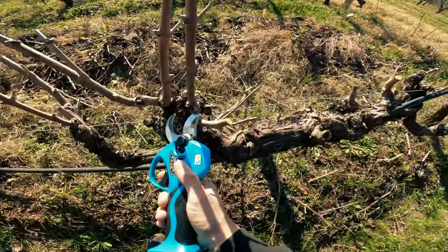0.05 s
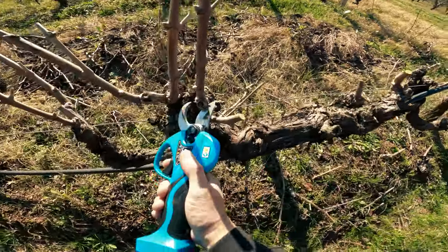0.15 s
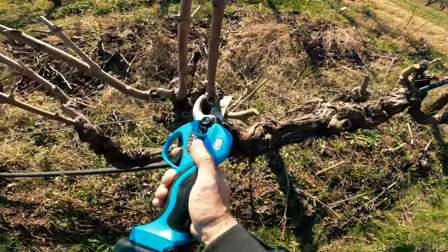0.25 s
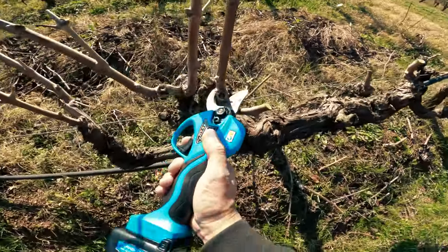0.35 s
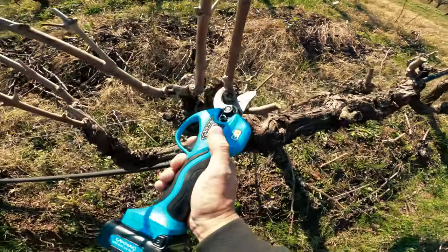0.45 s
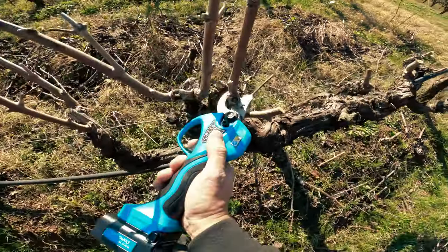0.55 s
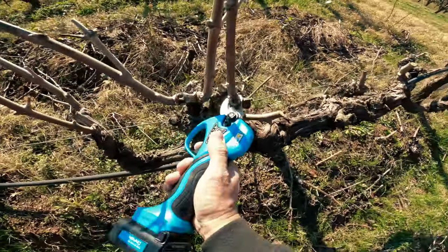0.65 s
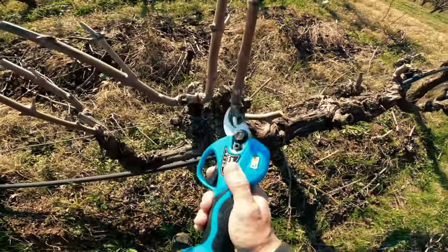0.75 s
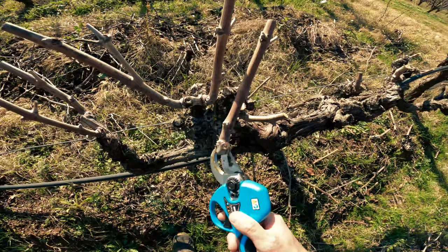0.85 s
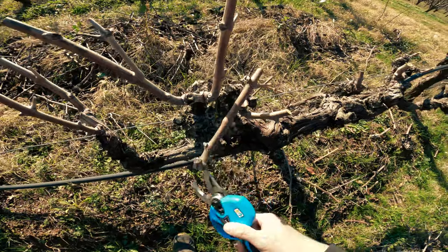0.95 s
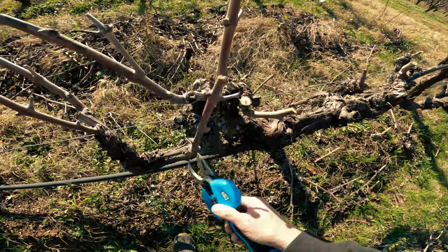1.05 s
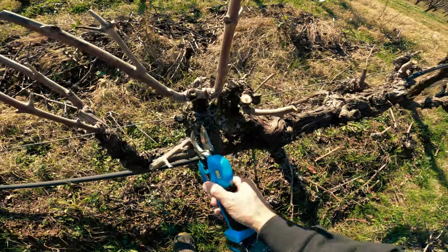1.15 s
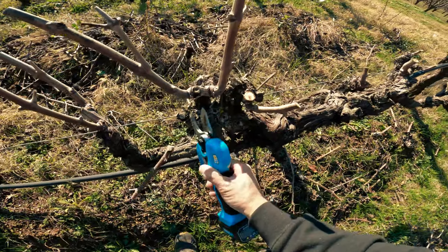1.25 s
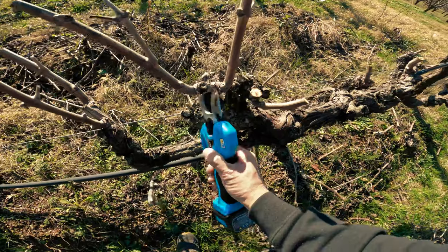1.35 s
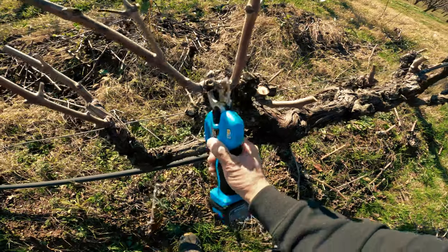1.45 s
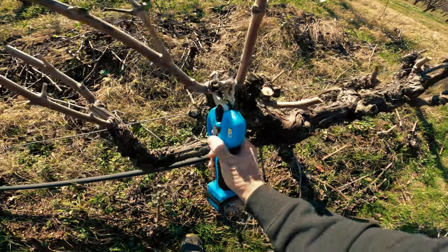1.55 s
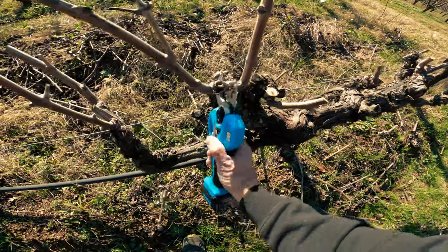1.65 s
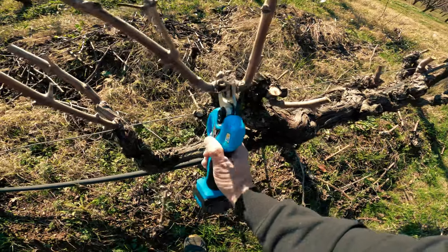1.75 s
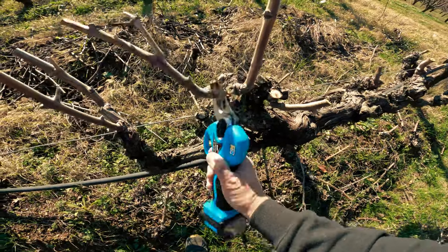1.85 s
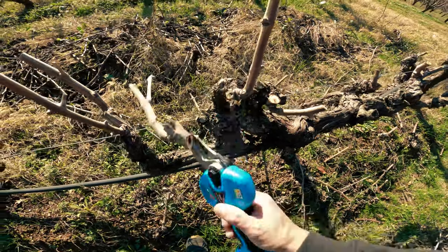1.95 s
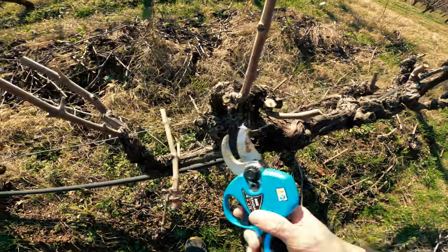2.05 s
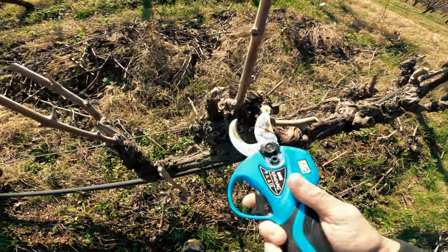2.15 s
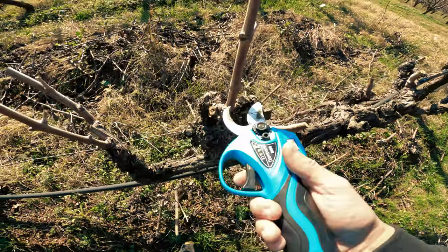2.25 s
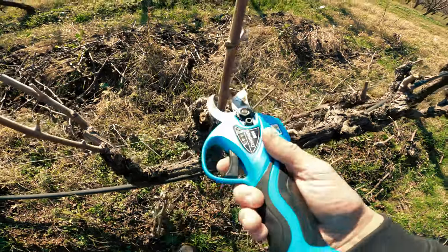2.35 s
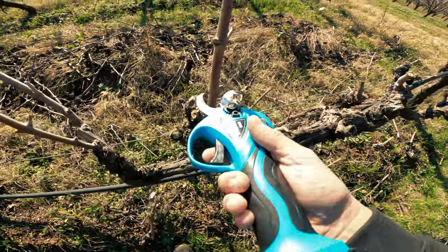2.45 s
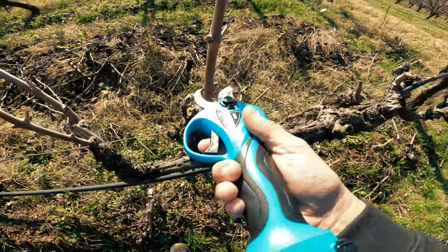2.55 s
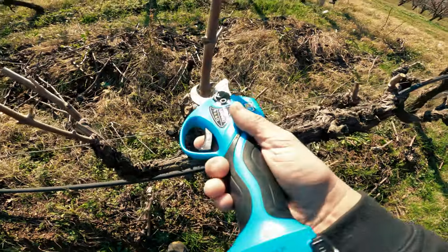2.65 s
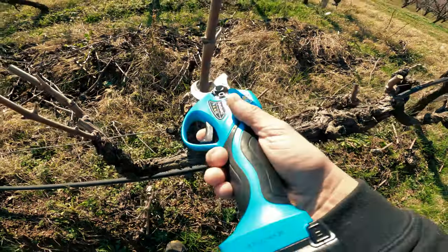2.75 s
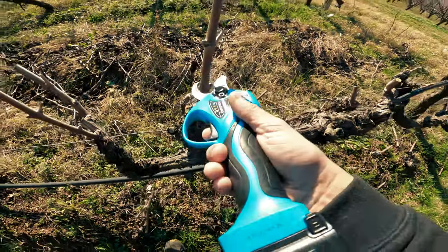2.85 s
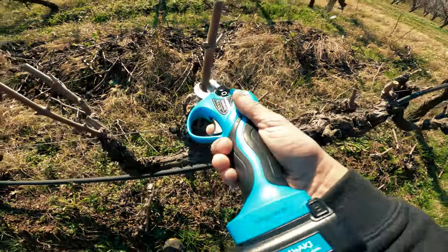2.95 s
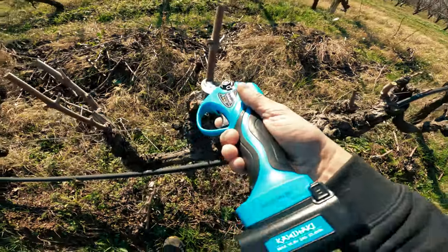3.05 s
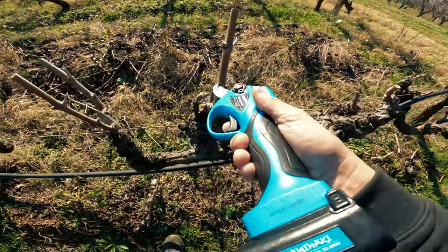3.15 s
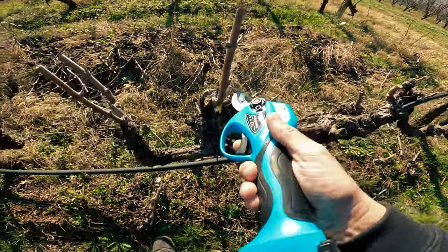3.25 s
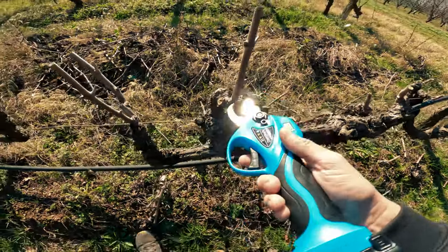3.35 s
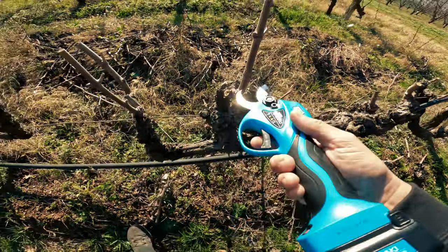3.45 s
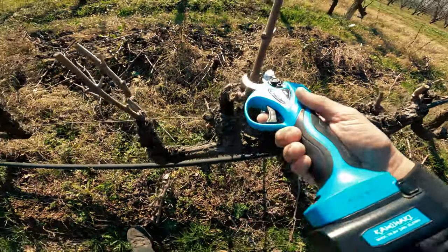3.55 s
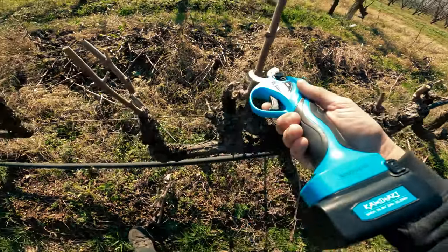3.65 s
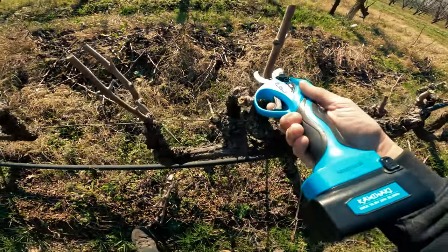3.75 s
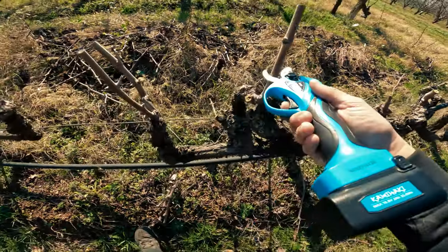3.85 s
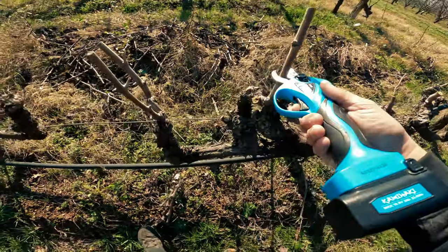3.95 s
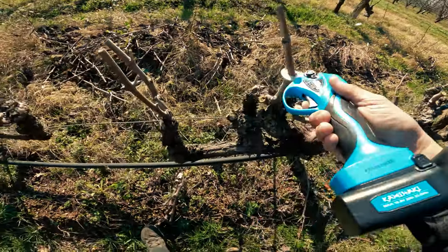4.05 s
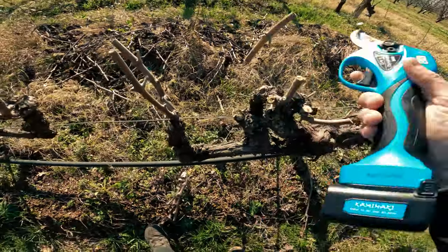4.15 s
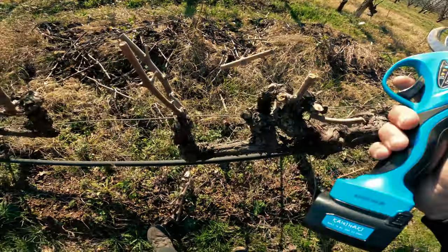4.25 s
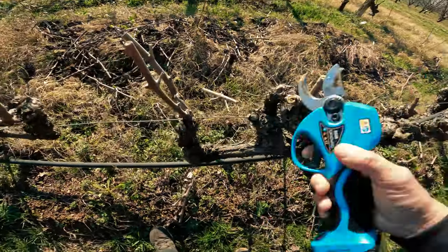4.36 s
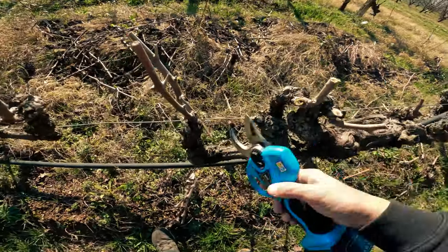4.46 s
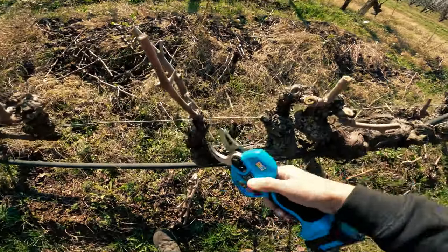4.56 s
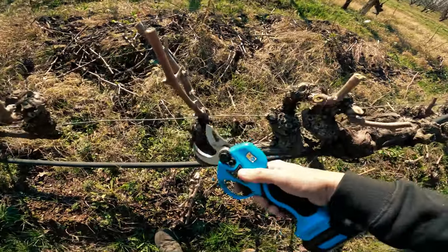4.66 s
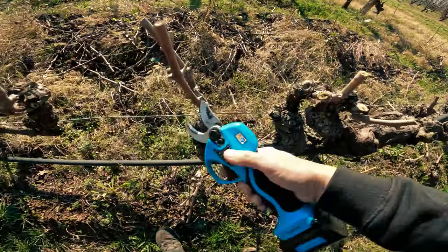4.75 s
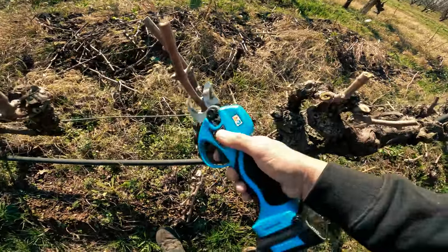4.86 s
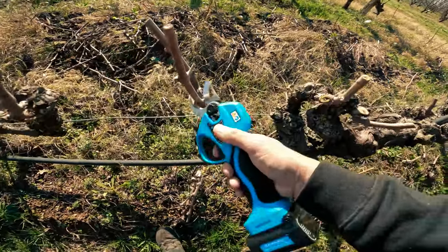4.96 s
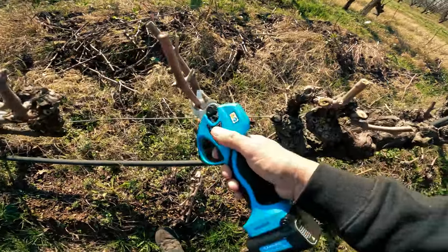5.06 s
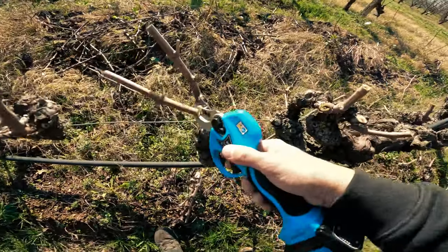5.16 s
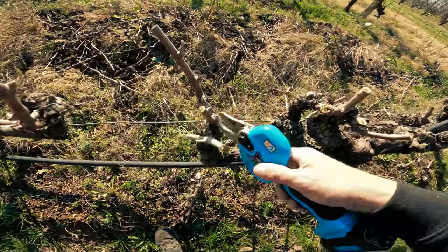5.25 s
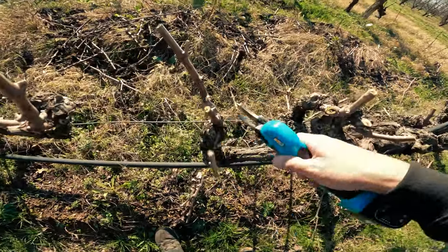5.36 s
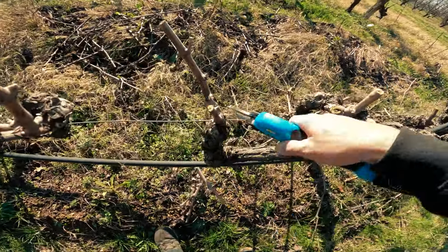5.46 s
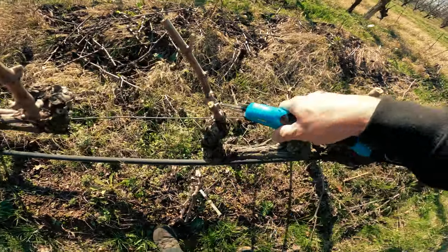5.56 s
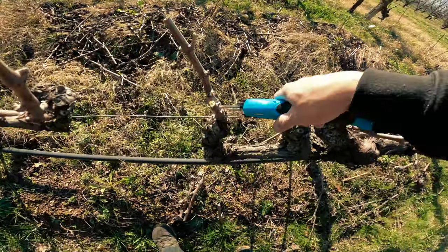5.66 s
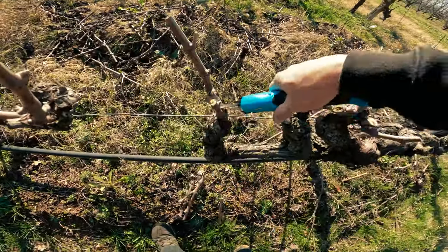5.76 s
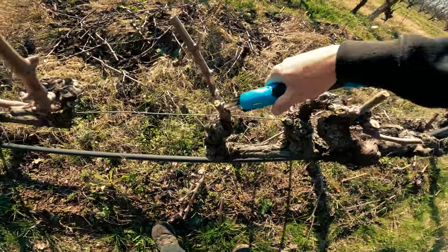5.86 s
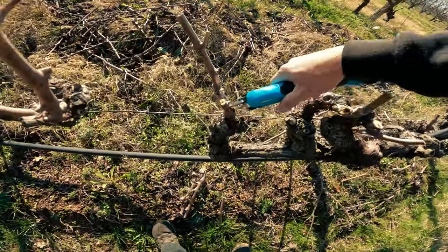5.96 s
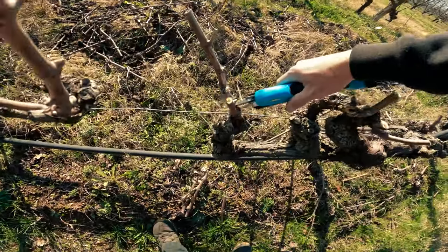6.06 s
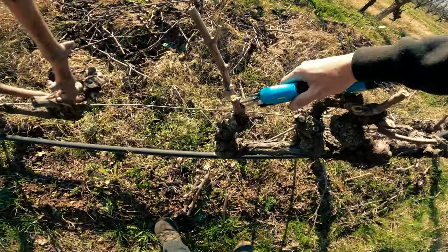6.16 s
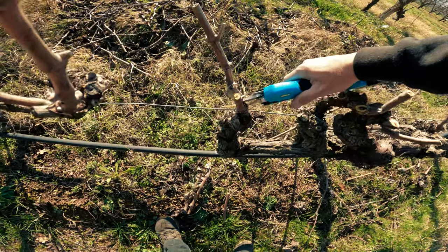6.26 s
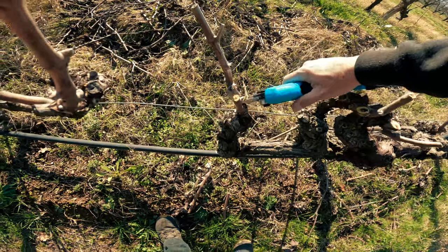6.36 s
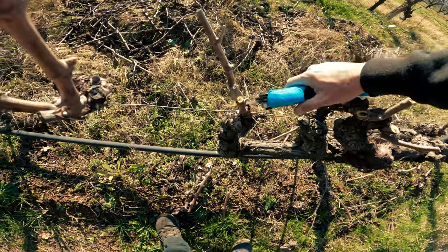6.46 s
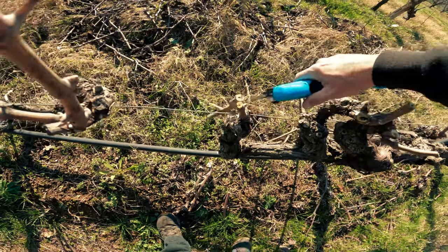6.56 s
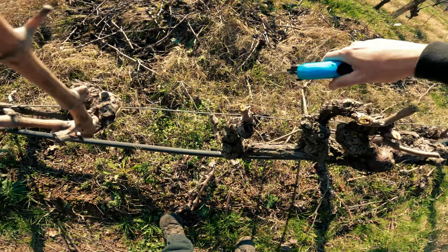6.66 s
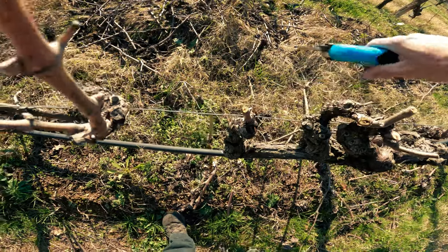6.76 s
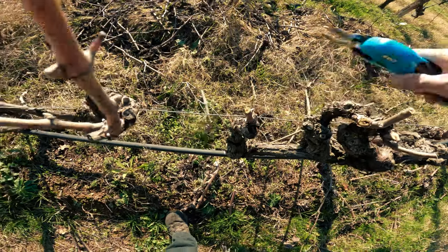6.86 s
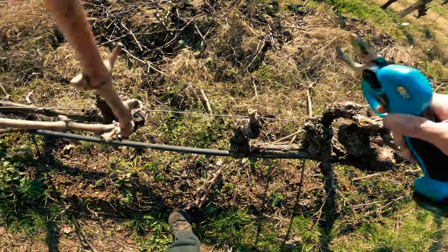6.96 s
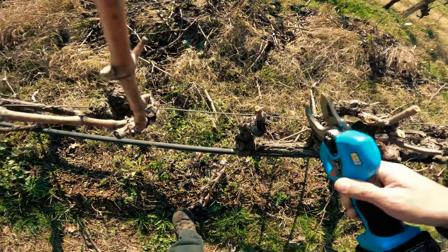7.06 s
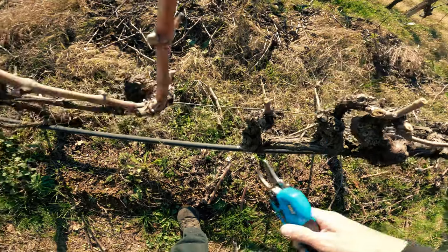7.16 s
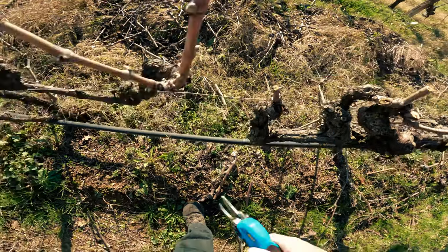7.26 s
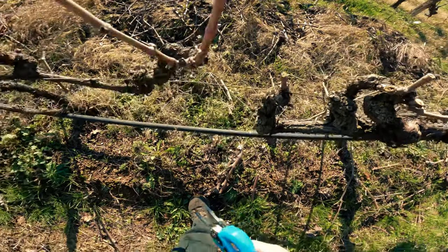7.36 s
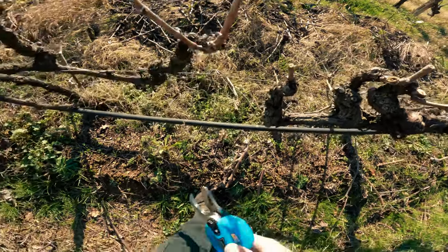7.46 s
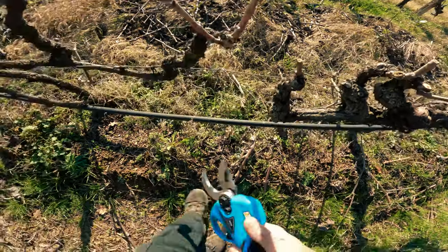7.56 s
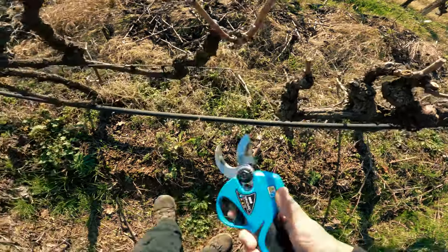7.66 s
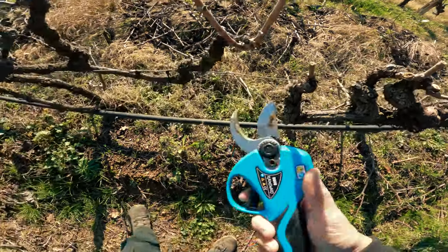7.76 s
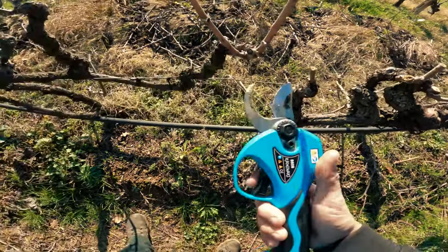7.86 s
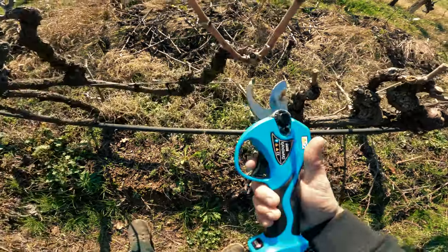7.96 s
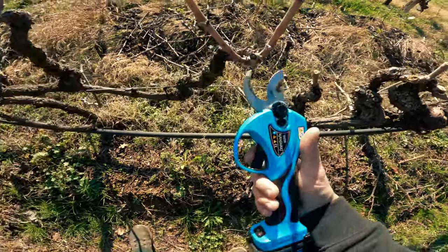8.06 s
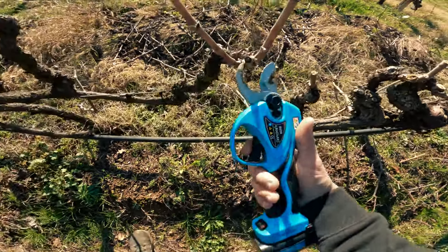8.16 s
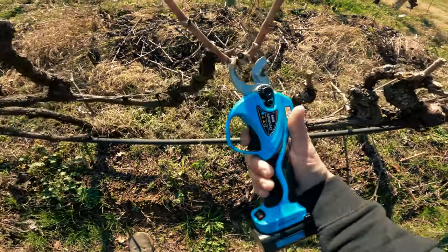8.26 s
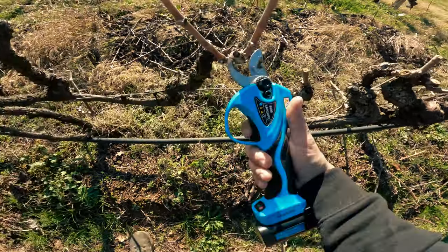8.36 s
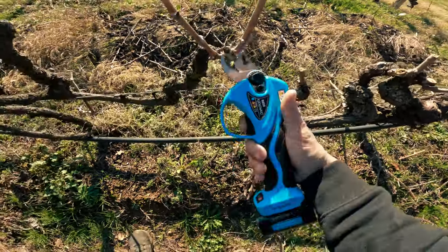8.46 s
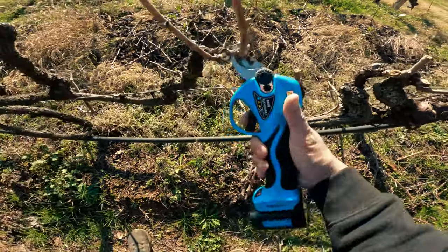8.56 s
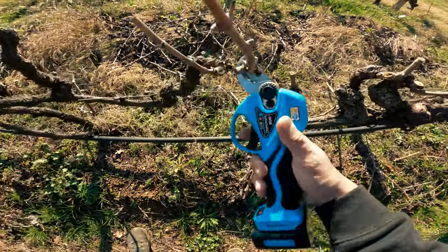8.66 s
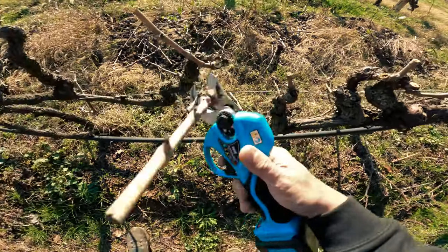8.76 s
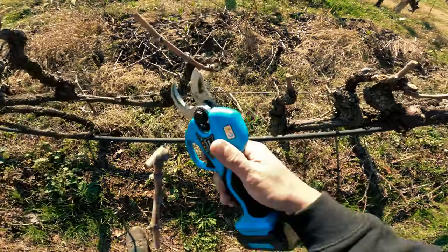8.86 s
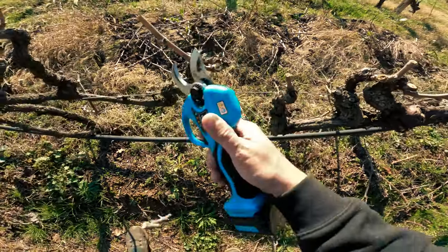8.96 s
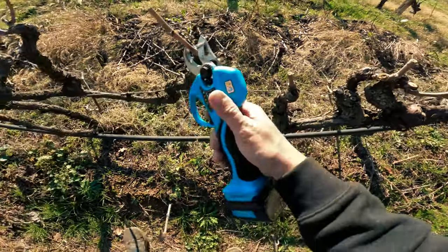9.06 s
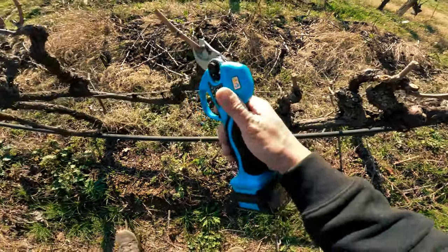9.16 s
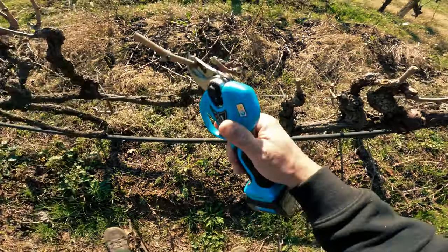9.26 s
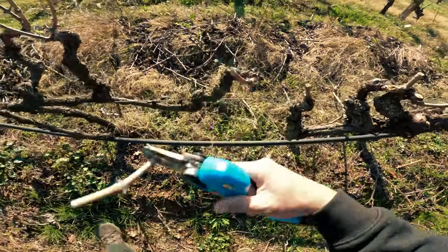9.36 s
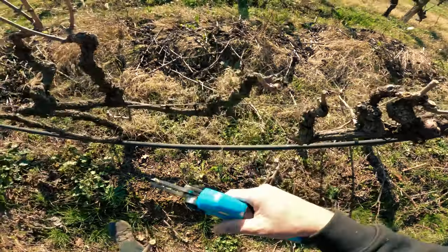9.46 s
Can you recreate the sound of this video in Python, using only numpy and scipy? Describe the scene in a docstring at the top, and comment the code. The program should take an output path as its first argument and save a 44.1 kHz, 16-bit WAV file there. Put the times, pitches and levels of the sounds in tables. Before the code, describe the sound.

Close up outdoors, a small geared motor whines shut, crunches and snaps dry canes, then rattles open again, with knocks and sleeve rustle between.

```python
"""In a quiet vineyard, cordless electric pruning shears cut vine canes at arm's length.
Each stroke starts with ringing motor modes; tones at multiples of motor speed then whine over gear impacts.
On closing strokes the wood loads the motor, lowers its speed, crunches in clustered grains and cracks.
Noise bursts and grains give the knocks, scrapes, bark ticks and rustling sleeve; low noise is the breeze."""
import sys
import numpy as np
from scipy import signal
from scipy.fft import rfft, irfft, next_fast_len
from scipy.io import wavfile
from scipy.ndimage import map_coordinates

SR = 44100
rng = np.random.default_rng(int(sys.argv[2]) if len(sys.argv) > 2 else 0)


def store_pcm(level_fs):
    """Save levels as 16-bit WAV."""
    pcm = np.round(np.clip(level_fs, -1, 1) * 32767).astype(np.int16)
    wavfile.write(sys.argv[1], SR, np.atleast_2d(pcm).T)


N = 418950
T = np.arange(N) / SR
OPPOSITE = np.array([[1], [-1]])  # signs of the left and right channel


def from_db(db):
    """Level: decibels become an amplitude ratio."""
    return 10 ** (np.asarray(db) / 20)


def rms_one(x):
    """Normalisation: scale to unit mean power."""
    return x / np.sqrt(np.mean(x ** 2) + 1e-20)


def at_hz(points, hz):
    """Interpolation: read a spectrum on a logarithmic frequency axis."""
    freq, value = np.transpose(points)
    return np.interp(np.log(np.maximum(hz, 1)), np.log(freq), value)


def colour(x, spectrum, size=4096):
    """Minimum-phase filtering: fold the cepstrum into a causal response; white noise keeps its power."""
    hz = np.arange(size // 2 + 1) * SR / size
    cepstrum = irfft(np.log(from_db(at_hz(spectrum, hz))))
    response = irfft(np.exp(rfft(2 * cepstrum[:size // 2], size)))
    return signal.fftconvolve(x, response / np.linalg.norm(response))[:len(x)]


def drift(rate, t):
    """Band-limited chance: smooth random values with a spread near 1, renewed rate times a second."""
    steps = (t - t[0]) * rate
    values = rng.standard_normal(int(steps[-1]) + 2)
    return map_coordinates(values, [steps], order=2, mode="nearest")


def grains(per_s, spread_db, count):
    """Shot noise: random clicks, many small and a few large, at unit power."""
    sizes = from_db(spread_db * np.minimum(rng.exponential(1, count), 4)) * rng.choice([-1, 1], count)
    return rms_one(sizes * (rng.random(count) < per_s / SR))


def swell(middle, half):
    """Gaussian envelope: a smooth rise and fall of height 1."""
    return np.exp(-np.minimum(((T - middle) / half) ** 2, 50))


def panned(pan_db):
    """Level difference: gains of the left and right channel."""
    return from_db(OPPOSITE * pan_db / 2)


def add(out, start, sound):
    """Superposition: mix a sound in at its start time."""
    i = max(round(start * SR), 0)
    out[..., i:i + sound.shape[-1]] += sound[..., :N - i]


# breeze spectrum: f/Hz, level/dB
BREEZE_SPECTRUM = [(15, -5.5), (28, 2), (70, -5), (100, -10), (150, -19.5), (230, -26.5), (400, -38),
                   (900, -51), (3000, -77.5)]
# gusts: middle t/s, half length t/s, level/dB
GUSTS = [(6.654, 0.4, -40), (7.847, 1, -42)]
BREEZE_DB = -46.5  # between gusts


def breeze(apart=.25):
    """Partial coherence: low rumble of moving air swells in gusts, mostly shared by both microphones."""
    shared, own = (colour(rng.standard_normal(N), BREEZE_SPECTRUM, size=16384) for _ in range(2))
    gust_power = sum((from_db(db) * swell(s, half)) ** 2 for s, half, db in GUSTS)
    power = from_db(BREEZE_DB) ** 2 + gust_power
    return np.sqrt(power) * (shared + apart * own * OPPOSITE)


# cloth moves or the grip is rubbed: middle t/s, half length t/s, rustle level/dB, hiss level/dB
RUBS = [(0.036, 0.38, -65.5, -62.5), (.52, 0.089, -66.5, -56.5), (1.383, 0.13, -62.5, -77),
        (1.636, 0.087, -59, -46), (2.477, 0.113, -55.5, -50), (2.722, 0.18, -64, -56),
        (3.836, 0.21, -62.5, -62.5), (4.693, 0.14, -63.5, -60), (5.804, 0.14, -67, -59.5),
        (6.098, .2, -72, -80), (7.168, 0.2, -59.5, -54.5), (7.655, 0.24, -54, -53.5),
        (7.985, 0.31, -61, -57.5), (8.028, 0.038, -52, -58.5), (8.407, 0.061, -59, -64.5)]
STILL_RUSTLE_DB, STILL_HISS_DB = -72, -79  # while the arm is held steady


def rubbing():
    """Power summation: each rub swells over the stir of the steady arm; gives rustle and hiss in dB."""
    rustle, hiss = from_db(STILL_RUSTLE_DB) ** 2, from_db(STILL_HISS_DB) ** 2
    for s, half, rustle_db, hiss_db in RUBS:
        move = swell(s, half)
        rustle = rustle + (from_db(rustle_db) * move) ** 2
        hiss = hiss + (from_db(hiss_db) * move) ** 2
    return 10 * np.log10(rustle), 10 * np.log10(hiss)


# cloth rustle spectrum: f/Hz, level/dB
RUSTLE_SPECTRUM = [(150, -12.5), (500, -16.5), (900, -7), (1500, 2), (2500, -2.5), (4500, -7),
                   (8000, -18.5), (16000, -41)]
# cloth hiss spectrum: f/Hz, level/dB
HISS_SPECTRUM = [(2000, -13), (5000, 7), (7500, 2), (10000, -3.5), (12500, -9.5), (16000, -27)]


def sleeve(rustle, hiss, rustle_db=3.0, hiss_db=-6.5):
    """Friction noise: rubbing makes fine uneven grains; the hiss differs between the channels."""
    rustle_gain = from_db(rustle + rustle_db + 2.6 * drift(45, T))
    cloth = rustle_gain * colour(grains(9000, 2.7, N), RUSTLE_SPECTRUM)
    left, right, shared = [colour(grains(12000, 2.5, N), HISS_SPECTRUM) for _ in range(3)]
    hiss_gain = from_db(hiss + hiss_db + 1.5 * drift(40, T))
    return cloth + hiss_gain * (1.25 * shared + 0.49 * np.array([left, right]))


# canes slide on the tool and each other: middle t/s, half length t/s, level/dB
SCRAPES = [(0.35, 0.014, -49), (0.503, 0.004, -43), (1.352, 0.0095, -36.5), (1.493, 0.0027, -34),
           (1.505, 0.0066, -34), (1.636, 0.0026, -26), (1.637, .025, -43.5), (3.359, .035, -50),
           (7.092, .015, -31.5), (7.122, 0.018, -36.5)]
# scraping bark spectrum: f/Hz, level/dB
SCRAPE_SPECTRUM = [(150, -6), (500, -15), (1500, -2), (3000, 1), (5500, 8), (8000, -0.5), (12000, -10),
                   (16000, -28.5)]


def scrapes():
    """Stick-slip: bark catches and slips in a brief swell of grains."""
    level = sum(from_db(db) * swell(s, half) for s, half, db in SCRAPES)
    return colour(level * grains(5000, 4.6, N), SCRAPE_SPECTRUM)


# low part of a blow: f/Hz, level/dB
THUMP_SPECTRUM = [(60, -10), (130, -1.5), (200, -1), (300, -2.5), (450, -10), (700, -13), (2000, -37.5),
                  (16000, -77.5)]
# woody middle of a blow: f/Hz, level/dB
KNOCK_SPECTRUM = [(200, -32.5), (600, -9.5), (1200, 7), (2200, 5), (3500, -4.5), (7000, -23),
                  (16000, -58.5)]
# bright part of a blow: f/Hz, level/dB
SNAP_SPECTRUM = [(500, -32.5), (2500, -5), (4000, 8.5), (6500, 4), (9000, 1.5), (12000, -5.5),
                 (16000, -21.5)]


def blows(table, decay, level_db):
    """Impact: a fast-dying burst of bright snap, woody knock and longer low thump."""
    thumps, knocks, snaps = np.zeros((3, N))
    t = np.arange(SR // 10) / SR
    for s, thump_db, knock_db, snap_db in table:
        parts = ((thumps, thump_db, 1.41 * decay), (knocks, knock_db, decay), (snaps, snap_db, 0.6 * decay))
        for out, db, length in parts:
            fading_db = db + level_db - 6.57 * t / max(length, .0005)
            add(out, s, from_db(fading_db) * rng.standard_normal(len(t)))
    return colour(thumps, THUMP_SPECTRUM) + colour(knocks, KNOCK_SPECTRUM) + colour(snaps, SNAP_SPECTRUM)


def crackle(rustle, per_s=45, level_db=-4, bump_db=-3):
    """Sparse impacts: dry bark and stems tick and the hand bumps the grip, louder with the rustle."""
    ticks = colour(grains(per_s, 2.6, N), KNOCK_SPECTRUM)
    ticks = ticks + .5 * colour(grains(per_s, 3.0, N), SCRAPE_SPECTRUM)
    bumps = from_db(bump_db) * colour(grains(per_s / 2, 3.6, N), THUMP_SPECTRUM)
    return from_db(rustle + level_db + 4.2 * drift(26, T)) * (ticks + bumps)


# tool, hand and canes bump, or the blade clacks at its stop:
# t/s, thump level/dB, knock level/dB, snap level/dB
KNOCKS = [(0.164, -68, -44, -52), (0.357, -68, -41.5, -53), (0.441, -70, -50, -47.5),
          (0.505, -59, -48, -50), (0.557, -70, -67, -42.5), (1.13, -36.5, -36.5, -44),
          (1.627, -36.5, -33.5, -26), (2.083, -66, -34, -55), (2.196, -41, -23.5, -36),
          (2.474, -36.5, -39.5, -35.5), (2.521, -58, -57, -37.5), (2.724, -53, -48.5, -47.5),
          (2.794, -34.5, -40, -37), (3.372, -63, -34.5, -47), (3.389, -35.5, -26.5, -33),
          (3.417, -37, -46, -34), (3.484, -30.5, -50, -29), (4.682, -45.5, -49, -41),
          (5.623, -53, -36, -36.5), (5.737, -52, -23, -37), (5.852, -54, -60, -42.5),
          (5.908, -73.5, -47, -60), (6.369, -67, -51.5, -46), (6.844, -32.5, -27, -59),
          (7.625, -41, -38, -43), (7.659, -44, -41, -49), (7.846, -65, -46, -42), (7.994, -43.5, -46, -46),
          (8.15, -66, -45.5, -58), (8.445, -68, -43, -37), (9.443, -61, -35, -57)]


def knocks():
    """Collision: tool, hand and canes bump, or the blade clacks at its stop, in short broadband blows."""
    return blows(KNOCKS, decay=0.0039, level_db=2.0)


# steel touches a cane: t/s, level/dB
BLADE_TAPS = [(0.505, -40), (1.492, -33.5), (7.846, -47), (8.445, -38)]
# steel tip spectrum: f/Hz, level/dB
STEEL_SPECTRUM = [(4000, -34), (8000, -2), (12500, 9), (16000, -5)]
TAP_DECAY_S = .0015


def blade_taps():
    """Hard contact: the steel tip gives a tiny, very bright tick of decaying noise."""
    out, t = np.zeros(N), np.arange(SR // 20) / SR
    for s, db in BLADE_TAPS:
        add(out, s, from_db(db) * np.exp(-t / TAP_DECAY_S) * rng.standard_normal(len(t)))
    return colour(out, STEEL_SPECTRUM)


# the trigger clicks: t/s, level/dB
TRIGGER_CLICKS = [(0.649, -32.5), (1.77, -37.5), (1.786, -24), (5.085, -25), (6.455, -28)]


def trigger(thump_db=-38, snap_db=-4):
    """Light impact: the trigger gives a short blow on the plastic."""
    rows = [(s, db + thump_db, db, db + snap_db) for s, db in TRIGGER_CLICKS]
    return blows(rows, decay=.002, level_db=1.0)


# wood gives way under the blade: t/s, thump level/dB, knock level/dB, snap level/dB
CRACKS = [(0.862, -35.5, -21.5, -31), (1.95, -42, -22, -23), (1.964, -49, -36, -21.5),
          (2.002, -53.5, -31, -33.5), (2.006, -35.5, -22.5, -22.5), (3.18, -46, -21.5, -21),
          (3.194, -40.5, -28, -33), (3.206, -38, -32, -27), (4.254, -36.5, -19, -27),
          (5.252, -59, -37.5, -19), (5.288, -41.5, -18, -22), (6.592, -44, -21.5, -22),
          (6.614, -43, -24.5, -25), (6.627, -46, -19.5, -24), (6.675, -58, -23, -28),
          (6.684, -68, -24, -20.5), (6.693, -36, -30, -49), (8.679, -34.5, -23.5, -16.5),
          (8.703, -37.5, -17.5, -23), (9.319, -60, -23, -26), (9.337, -32.5, -23, -29),
          (9.343, -41, -20, -23), (9.364, -52, -13.5, -36)]


def cracks():
    """Fracture: wood gives way under the blade in sudden short bursts."""
    return blows(CRACKS, decay=0.0028, level_db=4.5)


# modes of the motor can: f/Hz, level/dB, 60 dB decay t/s
CAN_MODES = [(2050, -38.5, 0.0067), (2720, -5.5, 0.0056), (3940, 1.5, .005), (4730, 7, 0.0081),
             (5650, 13.5, 0.0084), (9000, -3, 0.0027), (7960, -16.5, 0.0056), (11200, -32, .003)]


def start_tick(t, spacing=0.001087, count=4):
    """Modal ringing: the controller's current pulses probe the rotor and ring the can, strongest mid-run."""
    ring = 0
    for hz, db, t60 in CAN_MODES:
        level_db = db + rng.normal(0, 3.7) - 60 * t / t60
        ring = ring + from_db(level_db) * np.sin(2 * np.pi * hz * t)
    heights = np.hanning(count + 2)[1:-1] ** 2 * rng.uniform(0.49, 1, count)
    tick = sum(height * np.interp(t - k * spacing, t, ring, left=0) for k, height in enumerate(heights))
    return tick / np.abs(tick).max()


# controller timing, in seconds of unloaded travel; the creep is a share of full speed
SPIN_UP_S, SPIN_UP_CURVE, TRAVEL_S, BRAKE_S, CREEP_SHARE = .069, 1.55, .192, .033, .25


def drive(progress):
    """Speed control: the motor spins up, holds and brakes to a creep; gives speed share and braking 0-1."""
    spin_up = np.sin(np.pi / 2 * np.minimum(progress / SPIN_UP_S, 1)) ** SPIN_UP_CURVE
    brake = 1 - np.exp(-(np.maximum(progress - TRAVEL_S, 0) / BRAKE_S) ** 2)
    return spin_up * (1 - (1 - CREEP_SHARE) * brake), brake


# these times too are in unloaded travel; the whine is lowered at rest by WHINE_REST_DB
TAKE_UP_S, SURGE_S, STOP_DB_PER_S, WHINE_REST_DB = 0.0047, 0.024, 1405, -41.5


def loudness(progress, share, brake, slack_s, slack_db, surge_db, creep_db, braked_whine_db, stop_s):
    """Backlash: slack gears engage with a level change, run, creep and fall silent; gives rattle, whine dB."""
    engaged = np.clip((progress - slack_s) / TAKE_UP_S, 0, 1)
    surge = surge_db * engaged * np.exp(-np.maximum(progress - slack_s, 0) / SURGE_S)
    onset = 20 * np.log10(np.minimum(progress / TAKE_UP_S, 1))
    running = onset - STOP_DB_PER_S * np.maximum(progress - stop_s, 0)
    rattle_db = running + surge + slack_db * (1 - engaged) + creep_db * brake
    # the whine grows from rest as the motor spins up
    whine_db = running + surge + WHINE_REST_DB * (1 - share) ** 2 * (1 - brake) + braked_whine_db * brake
    return rattle_db, whine_db


# the blade meets a cane: contact t/s, pressing t/s, held t/s, speed lost f/Hz,
# gear growl level/dB, gear squeal level/dB, fibre crunch level/dB
BITES = [(.728, .075, .028, 46, -28.5, -27, -26), (1.865, .055, 0.07, 43, -26, -32.5, -27),
         (3.143, 0.035, 0.0016, 30, -28.5, -33.5, -26.5), (4.143, 0.056, 0.036, 12, -23.5, -31.5, -34),
         (5.208, 0.024, 0.021, 19.7, -26, -38, -16), (6.536, .056, .073, 62, -28, -24, -28.5),
         (8.612, 0.057, 0.0087, 29, -31, -32, -18.5), (9.303, 0.042, 0.0059, 25, -32.5, -37, -29)]
BREAK_THROUGH_S = .046  # the motor recovers once the cane gives


def bite(start, t):
    """Mechanical load: the nearest cane slows the motor; gives speed lost in Hz, recoil 0-1, cane levels."""
    contact, press, held, lost_hz, *levels_db = min(BITES, key=lambda row: abs(row[0] - start))
    corners = contact + np.cumsum([0, press, held, BREAK_THROUGH_S])
    grip = np.interp(start + t, corners, [0, 1, 1, 0])
    since_release = start + t - contact - press - held
    recoil = np.maximum(1 - np.abs(since_release / BREAK_THROUGH_S - 1), 0)
    return lost_hz * grip, recoil, levels_db


# how well the housing radiates a line: f/Hz, level/dB
HOUSING = [(300, -24), (1100, -2.5), (1700, 2), (2200, 5.5), (2450, -0.5), (2750, 1), (3100, 1.5),
           (3800, -4), (4400, -5), (4900, -0.5), (5300, 2), (5800, 3), (6400, 7.5), (12000, -5.5)]
CARRIER_SHARE = .1762  # turns of the planet carrier per motor turn


def whine(lines, speed, turns, rough, t):
    """Order tones: tooth and pole lines glide through housing resonances, shaken by carrier and load."""
    out = 0
    for multiple, db in lines:
        sway = 1 + 0.31 * np.sin(2 * np.pi * (CARRIER_SHARE * turns + rng.random()))
        phase = 2 * np.pi * (multiple * turns + rng.random()) + rough * drift(260, t)
        flutter = 1 + rough * drift(300.4, t)
        out = out + from_db(db + at_hz(HOUSING, multiple * speed)) * sway * flutter * np.sin(phase)
    return np.sqrt(2) * out


# resonances of gearbox and plastic shell: f/Hz, width f/Hz, level/dB
SHELL_MODES = [(703, 24, 4), (1105, 170, -11), (1450, 130, -11.5), (2106, 180, -1), (2880, 38, -15.5),
               (3010, 110, 0), (3476, 98, -4), (5080, 200, 0), (5910, 300, 0.5), (6200, 260, -12),
               (7080, 860, 1), (9700, 670, 1)]


def shell(x):
    """Resonance: the shell's modes stand out of the clatter."""
    modes = 0
    for hz, width, db in SHELL_MODES:
        modes = modes + from_db(db) * signal.lfilter(*signal.iirpeak(hz, hz / width, fs=SR), x)
    return 0.57 * (x + modes)


def rattle(turns, wear, spectrum, treble_db, repeat=.73, apart=.45):
    """Cyclic impacts: teeth clatter in a pattern that returns each carrier turn, amid loose random hits."""
    tooth = np.floor(turns * CARRIER_SHARE * len(wear)).astype(int)
    pattern = rms_one(wear[tooth % len(wear)] * (np.diff(tooth, prepend=0) > 0))
    impacts = repeat * pattern + np.sqrt(1 - repeat ** 2) * grains(9000, 2.2, len(turns))
    body = shell(colour(impacts, spectrum))
    # short waves leave the shell differently towards each side
    side = apart * shell(colour(grains(8100, 2.0, len(turns)), spectrum)) * OPPOSITE
    high_pass = signal.butter(1, 5000, "high", fs=SR, output="sos")
    treble = from_db(treble_db)
    return body + signal.sosfilt(high_pass, (treble - 1) * body + treble * side)


# motor pole lines: multiple of motor speed, level/dB
MOTOR_LINES = [(3, -5.5), (6, -28), (9, -12.5), (12, -8), (15, 2), (18.65, -15), (24, -16), (27, -24)]
# crushed wood fibre spectrum: f/Hz, level/dB
FIBRES = [(150, -4), (450, -15.5), (1000, -3.5), (2600, 12), (4000, 4.5), (5500, -7), (8000, -18),
          (9800, -7.5), (12000, -14.5), (16000, -30.5)]
FULL_SPEED_HZ = 388.8  # motor turns per second without load
RECOIL_ROUGHNESS, RECOIL_DB = .6, -3.5  # unloaded teeth chatter and the whine breaks up


def strokes(table, mesh, high_mesh, spectrum, rattle_db, whine_db, **envelope):
    """Load and speed: each row is a motor run; strain slows it, presses the teeth and crushes fibres."""
    out, t = np.zeros((2, N)), np.arange(SR // 3) / SR
    wear = rng.standard_normal(168)  # impact strengths around one carrier turn
    for start, gear_db, treble_db, mesh_db, motor_db, high_db, pan_db, tick_db in table:
        lost_hz, recoil, (growl_db, squeal_db, crunch_db) = bite(start, t)
        allowed = FULL_SPEED_HZ - lost_hz
        # a slowed blade needs longer for its travel
        progress = np.cumsum(allowed / FULL_SPEED_HZ) / SR
        share, brake = drive(progress)
        course_db, tone_db = loudness(progress, share, brake, **envelope)
        speed = share * allowed
        turns = np.cumsum(speed) / SR
        strain = np.tanh(lost_hz / FULL_SPEED_HZ / 0.041)
        rough = .2 + .16 * strain + RECOIL_ROUGHNESS * recoil + 1.1 * (1 - share)

        # gear teeth sing louder under load; the magnetic whine is smoother
        mesh_gain = np.hypot(from_db(mesh_db), from_db(growl_db) * strain)
        high_gain = np.hypot(from_db(high_db), from_db(squeal_db) * strain)
        tones = mesh_gain * whine(mesh, speed, turns, rough, t)
        tones = tones + from_db(motor_db - 2.0 * strain) * whine(MOTOR_LINES, speed, turns, .7 * rough, t)
        tones = tones + high_gain * whine(high_mesh, speed, turns, rough, t)
        tones = from_db(whine_db + tone_db + RECOIL_DB * recoil) * tones

        bright_db = treble_db - 9 * (1 - share) - 1.5 * strain
        gear_gain = from_db(gear_db + rattle_db + course_db + 1.8 * strain)
        gears = gear_gain * rattle(turns, wear, spectrum, bright_db)

        # fibres give way in clumps
        clumps = grains(620, 4.4, len(t)) * from_db(5 * drift(110, t) - 4)
        crunch = from_db(crunch_db + course_db) * strain * colour(clumps, FIBRES)

        sound = tones + gears + crunch + from_db(tick_db) * start_tick(t)
        # a closing stroke fades out across the start of the next opening stroke
        gap = min([row[0] - start for row in OPENINGS if row[0] > start] + [1])
        sound = sound * np.clip((gap + .004 - t) / .016, 0, 1)
        add(out, start, sound * panned(pan_db))
    return out


# opening strokes: start t/s, rattle level/dB, extra treble level/dB, mesh level/dB,
# motor whine level/dB, high mesh level/dB, left-right level/dB, start tick level/dB
OPENINGS = [(0.944, -30.5, 2.5, -34.5, -34.5, -31, -2.5, -7.5), (2.115, -28, 2, -35, -36, -34, -3, -15.5),
            (3.4, -26.5, 1.5, -31, -37, -25, -3.5, -8.5), (4.344, -27, 2, -25.5, -33, -21, -4, -8),
            (5.363, -28, 0.5, -30.5, -35, -55, -4, -13), (6.779, -30.5, -0.5, -39, -37, -29, -4.5, -14.5),
            (8.789, -28, 0.5, -32.5, -34.5, -36, -3.5, -10),
            (9.486, -25.5, -3.6, -32.3, -36, -39.1, -5.5, -10.5)]
# gear lines and high gear lines: multiple of motor speed, level/dB
OPEN_MESH = [(5.67, -28), (7.878, -1.5), (8.229, -3)]
OPEN_HIGH_MESH = [(15.94, -11.5), (16.293, -16.5), (16.52, -22)]
# opening rattle spectrum: f/Hz, level/dB
OPEN_RATTLE = [(120, -9), (450, -13), (750, -4), (1200, 6.5), (2400, 5.5), (2900, 1.5), (3600, 5.5),
               (4100, -3), (6200, 2.5), (7100, -10.5), (8200, -10.5), (9800, -18.5), (12000, -20.5),
               (16000, -38.5)]


def openings():
    """Free running: the gears whine and rattle as the blade opens, with a surge as they engage."""
    return strokes(OPENINGS, OPEN_MESH, OPEN_HIGH_MESH, OPEN_RATTLE, rattle_db=0.0, whine_db=-2.0,
                   slack_s=0.024, slack_db=-7.5, surge_db=6.5, creep_db=-9.5,
                   braked_whine_db=-32, stop_s=0.3133)


def reversals(delay_s=.028, thump_db=-26, knock_db=1, snap_db=-14):
    """Backlash impact: on reversal the teeth cross their play and clack in scale with the stroke's rattle."""
    rows = [(start + delay_s, gear_db + thump_db, gear_db + knock_db, gear_db + snap_db)
            for start, gear_db, *rest in OPENINGS if start + delay_s < N / SR]
    return blows(rows, decay=.006, level_db=-2)


# closing strokes: start t/s, rattle level/dB, extra treble level/dB, mesh level/dB,
# motor whine level/dB, high mesh level/dB, left-right level/dB, start tick level/dB
CLOSINGS = [(0.653, -29.5, -2, -35, -26, -27.5, -1.5, -7.5),
            (1.8, -31.5, 2.7, -32.5, -44.5, -29, -2.5, -19), (3.021, -29, 1, -32.5, -27.5, -31, -4, -7),
            (4.058, -29, 0.5, -37.5, -31.5, -35, -5, -9.5), (5.096, -27, -4, -29, -36.5, -29.5, -3, -9),
            (6.47, -31.5, 2.5, -32.5, -52, -40, -4, -15), (8.504, -29, -4, -33.5, -26, -32, -4, -8),
            (9.168, -30, -6, -43, -29, -32.5, -3.5, -10.5)]
# gear lines and high gear lines: multiple of motor speed, level/dB
CLOSE_MESH = [(1.84, -14), (4.6, -16), (5.24, -16), (8.7, -15), (7.65, -8.5), (17, -14), (7.876, 3),
              (8.228, -2)]
CLOSE_HIGH_MESH = [(15.94, -7), (16.293, -5.5)]
# closing rattle spectrum: f/Hz, level/dB
CLOSE_RATTLE = [(120, -8.5), (450, -16), (750, -6), (1150, 0), (2200, 3.5), (2850, 0.5), (3500, 0.5),
                (4200, 1), (5800, 1.5), (7000, -4.5), (8200, -10.5), (9800, -13.5), (12000, -19.5),
                (16000, -35)]


def closings():
    """Loaded running: the whine sags in pitch as the closing blade bites through a cane."""
    return strokes(CLOSINGS, CLOSE_MESH, CLOSE_HIGH_MESH, CLOSE_RATTLE, rattle_db=3.0, whine_db=-2.5,
                   slack_s=.021, slack_db=-4.0, surge_db=-1.0, creep_db=-5.0,
                   braked_whine_db=-54.5, stop_s=0.2748)


def ground(x, level_db=-8, t60=0.04):
    """Scattering: soil, vines and body return a short, faint, mostly treble echo, different on each side."""
    t = np.arange(SR // 4) / SR
    scatter = signal.lfilter([1, -.55], [1], rng.standard_normal((2, len(t))))
    scatter = scatter * from_db(-60 * t / t60) * (t > .001)
    scatter /= np.linalg.norm(scatter, axis=1, keepdims=True)
    return x + from_db(level_db) * signal.fftconvolve(x, scatter, axes=1)[:, :N]


def scene():
    """Superposition: shears and canes close by, over cloth and breeze."""
    rustle, hiss = rubbing()
    air = breeze() * panned(-1.5)
    handling = (sleeve(rustle, hiss) + crackle(rustle)) * panned(-0.5)
    contacts = cracks() + knocks() + scrapes() + blade_taps()
    shears = closings() + openings() + trigger() + reversals()
    return ground(shears + contacts) + handling + air


# port balance: f/Hz, left-right level/dB
MIC_BALANCE = [(60, 0.9), (300, 0), (700, 3.5), (1400, 3), (2800, 2.5), (5800, 0.5), (9500, 3), (13000, 8)]
# port phase: f/Hz, lead of the left/rad
MIC_PHASE = [(150, 0.31), (700, -.3), (1400, -.7), (2800, -0.81), (5800, -0.91), (13000, -0.4)]
CUTOFF_HZ, PEAK_LIMIT = 15900, .6


def record(dry):
    """Stereo transfer: two close ports differ in level and phase; peaks are rounded and the top is cut."""
    size = next_fast_len(N + SR // 10)
    hz = np.arange(size // 2 + 1) * SR / size
    half = .5 * OPPOSITE
    ports = from_db(half * at_hz(MIC_BALANCE, hz)) * np.exp(1j * half * at_hz(MIC_PHASE, hz))
    heard = irfft(rfft(dry, size) * ports, size)[:, :N]
    heard = PEAK_LIMIT * np.tanh(heard / PEAK_LIMIT)
    low_pass = signal.ellip(10, .1, 80, CUTOFF_HZ, fs=SR, output="sos")
    return signal.sosfilt(low_pass, heard)


dry = scene()
out = record(dry)
store_pcm(out)
```